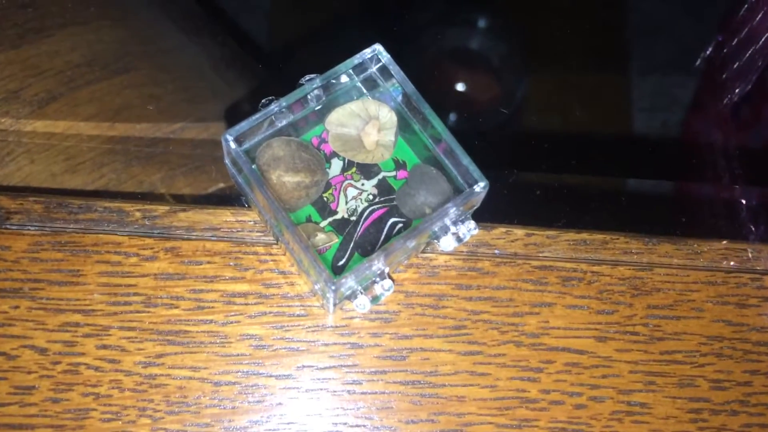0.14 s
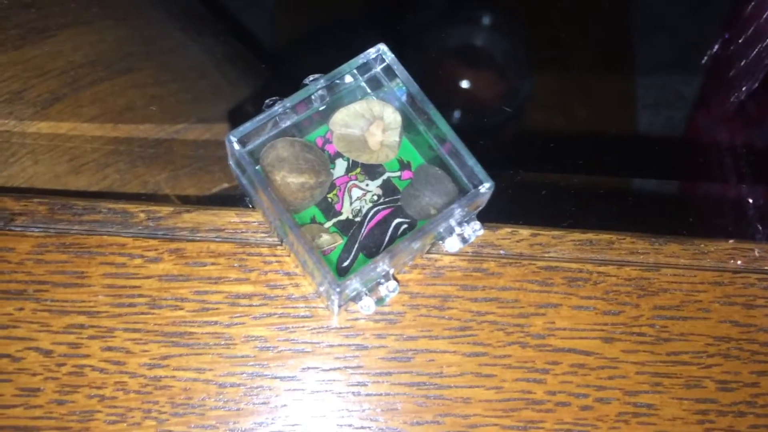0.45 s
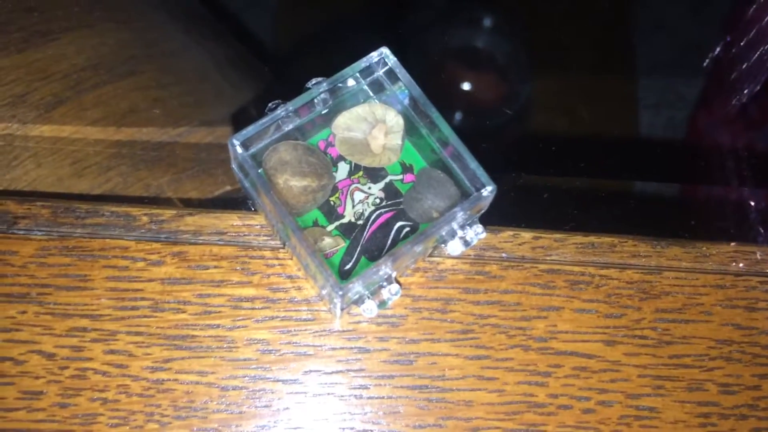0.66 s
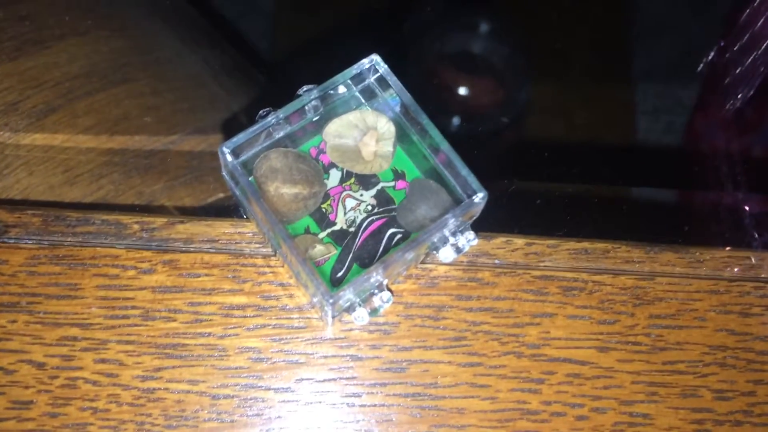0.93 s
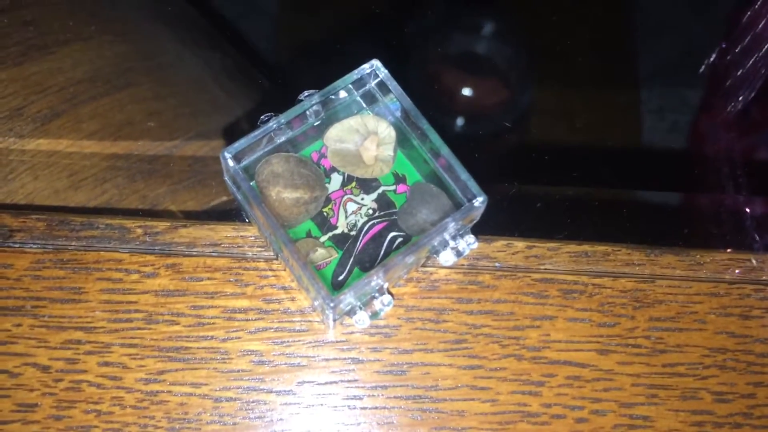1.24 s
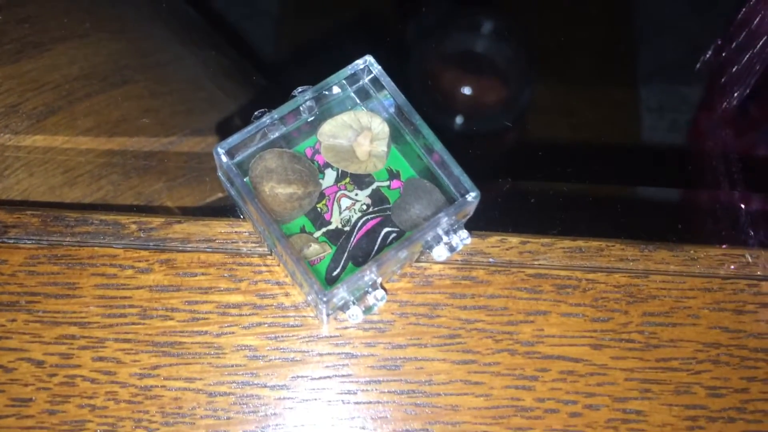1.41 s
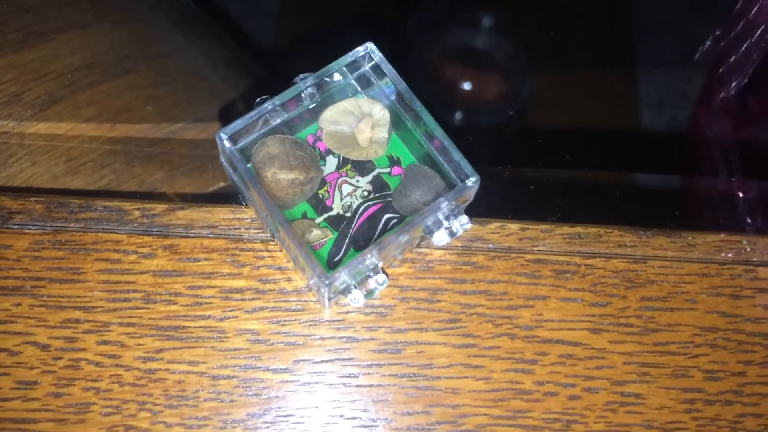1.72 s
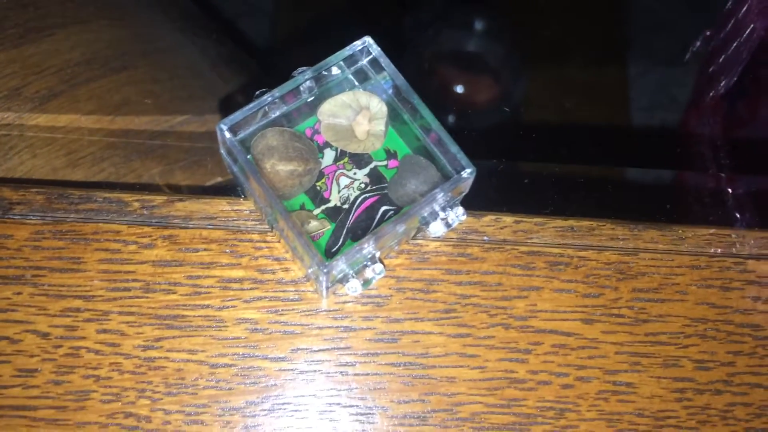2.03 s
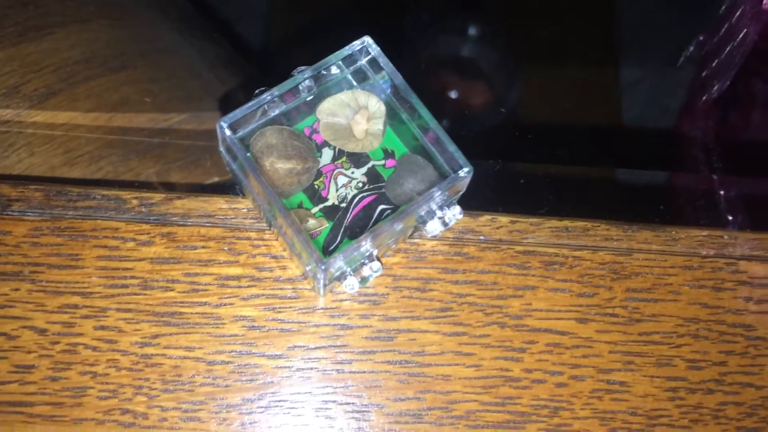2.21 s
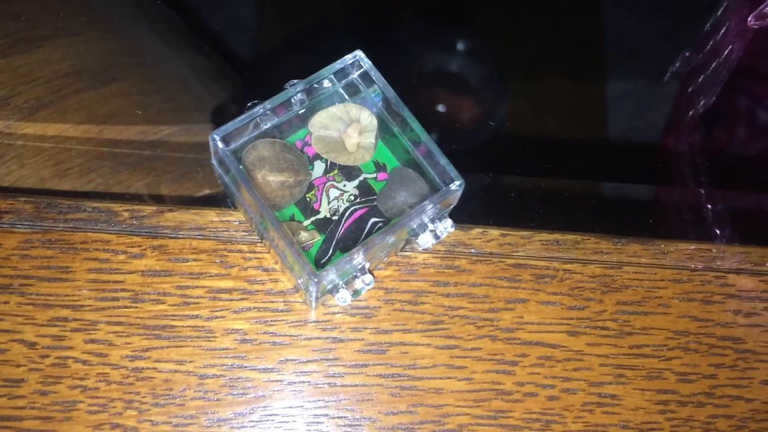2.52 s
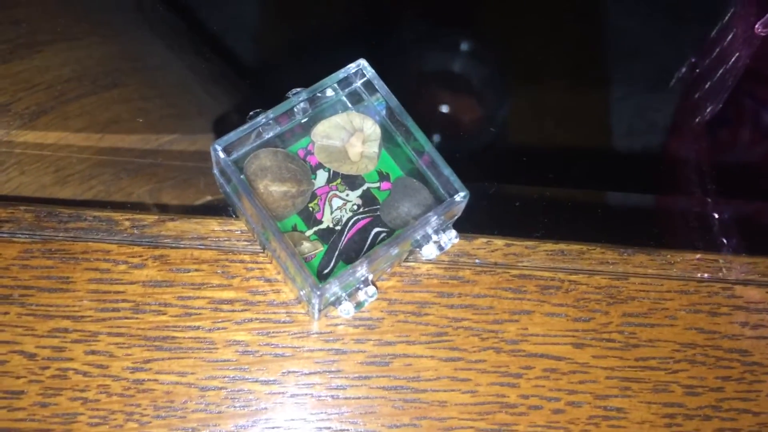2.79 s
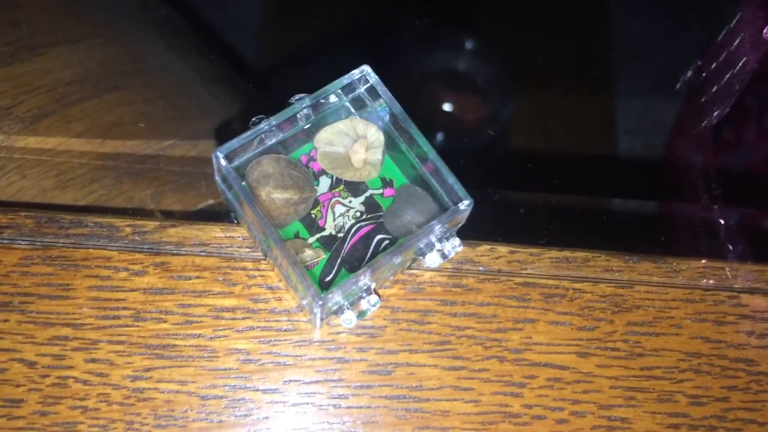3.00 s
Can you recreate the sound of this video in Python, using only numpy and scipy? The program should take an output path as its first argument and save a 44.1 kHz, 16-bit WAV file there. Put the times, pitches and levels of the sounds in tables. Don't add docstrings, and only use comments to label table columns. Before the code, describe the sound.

Three brief clattering clicks of small beans against thin plastic, over faint refrigerator hum

```python
import sys
import numpy as np
from scipy import signal
from scipy.fft import rfft, irfft
from scipy.io import wavfile
from scipy.ndimage import uniform_filter1d, map_coordinates

SR = 44100
rng = np.random.default_rng(int(sys.argv[2]) if len(sys.argv) > 2 else 0)


def gain_from_decibels(decibels):
    exponent = np.asarray(decibels, float) / 20
    return 10 ** exponent


def generate_wav(signal):
    frames = np.transpose(np.atleast_2d(signal))
    scaled = np.clip(frames, -1, 1) * 32767
    pcm = np.round(scaled).astype(np.int16)
    wavfile.write(sys.argv[1], SR, pcm)


N = 138915

# f/Hz, density/dB per Hz
AIR_SPECTRUM = [(18, -31), (30, -17.5), (59, -5), (181, -7), (221, -4.5), (392, -13), (551, -10),
                (1810, -19.5), (2200, -25), (2860, -54), (4840, -120)]
# f/Hz, width/Hz, lift/dB
FAN_DUCT = [(268, 58, 3), (530, 100, 2.5), (953, 33, 6.5), (1600, 54, 1.5), (1810, 20, 5.5)]
# f/Hz, density/dB per Hz
HISS_SPECTRUM = [(1290, -34), (2200, -8.5), (2460, -0.5), (2710, 3), (3040, -2), (5000, -4.5), (15000, -15)]
# f/Hz, level/dB rms, unsteadiness/dB
HUM_TONES = [(58.4, -63.5, 1.5), (74, -71.5, 4.5), (108.4, -69, 5), (147.6, -64.5, 2), (216.4, -60, 1),
             (243.5, -68.5, 1), (262.6, -71.5, 4), (318.6, -71, 4.5), (361, -74.5, 4.5), (430.6, -72.5, 4),
             (482.3, -69, 0.5), (548.3, -68, 4)]
# multiple of the shaft speed, level/dB rms
WHINE_TONES = [(13, -73), (14, -71), (15, -70), (16, -74), (17, -75), (19, -71), (20, -74), (30, -79),
               (31, -81)]
# f/Hz, t60/s
ROOM_DECAY = [(2000, 0.12), (5000, 0.11), (14000, 0.054)]
# f/Hz, level/dB
MICROPHONE_TOP = [(14600, 0), (15300, -20), (16200, -45)]
MODE_HZ = [2380, 4380, 4535, 4935, 5500, 6135, 6907, 7470, 7710, 9700, 10640, 11400, 12070, 13970]
MODE_T60_S = [.013, .055, .042, .022, .007, .05, .048, .032, .035, .016, .025, .008, .02, .016]
# level struck on the wall/dB, level struck on the floor/dB
MODE_DB = [(-15, -1.5), (-7.5, -0.5), (-5, -10.5), (-6.5, -8), (-7, -14), (-22, -18), (-19, -15),
           (-28, -2.5), (-8.5, -10.5), (-6, -10), (-21, -34), (-9.5, -8), (-19, -13.5), (-27, -16)]
# f/Hz, level/dB
WALL_CLICK = [(1000, -26), (3900, -13.5), (4600, 1), (6200, -2.5), (7700, -6), (10000, -6), (11900, -3.5),
              (13000, -20)]
# f/Hz, level/dB
FLOOR_CLICK = [(1500, -47), (2500, 12), (3500, -4.5), (4600, -5.5), (7800, 5), (11800, -11.5), (12700, -17),
               (13800, -9.5)]
# t/s, peak level/dB, ring level/dB, brightness/dB per octave
WALL_KNOCKS = [(.8735, -46, 2, -7), (.8802, -23.5, 0, -19), (.8827, -15.5, -3, 0.5), (1.8693, -48, -10, -8),
               (1.8761, -19.5, -1.5, -3.5), (1.8838, -21.5, -14, -7), (1.8955, -57, -9, -13),
               (2.9422, -53, 0, -10), (2.9527, -24, -2, 1), (2.9533, -17.5, 0.5, -1),
               (2.9630, -29, -1, -10)]
# t/s, peak level/dB, ring level/dB, brightness/dB per octave
FLOOR_LANDINGS = [
    (.8712, -38, 4, -7),
    (.9105, -17.5, -0.5, 3.5),
    (1.8738, -33, 1, -18),
    (1.9006, -21, 0.5, 2.5),
    (1.9040, -30, -4, -6),
    (2.9445, -58, 11, 2),
    (2.9738, -55, 9, 0),
    (2.9757, -41, 4, 11),
    (2.9769, -18, -1.5, 4.5),
]

AIR_DB, HISS_DB, ROOM_DB = -55, -71, -16
SHAFT_HZ = 59.38
RING_DB, SCATTER_DB, ATTACK_S = -10.5, 1.2, 0.0003
BOUNCE_S, BOUNCE_DB = 0.000177, 2.5
PIVOT_HZ = 4970


def unit(x):
    return x / np.sqrt(np.mean(x ** 2) + 1e-20)


def along(points, hz):
    f, value = np.transpose(points)
    return np.interp(np.log(hz + 1), np.log(f + 1), value)


def wobble(rate):
    knots = rng.standard_normal(int(N * rate / SR) + 4)
    return map_coordinates(knots, [np.arange(N) * rate / SR])


def noise(spectrum, patchy_db, humps=()):
    z = signal.stft(rng.standard_normal(N + SR), nperseg=512)[2]
    patches = uniform_filter1d(rng.standard_normal(z.shape), size=4, axis=0)
    patches = uniform_filter1d(patches, size=14, axis=1)
    x = signal.istft(z * gain_from_decibels(patchy_db * unit(patches)), nperseg=512)[1]
    f = np.fft.rfftfreq(len(x), 1 / SR)
    db = along(spectrum, f)
    for hz, width_hz, lift_db in humps:
        db = db + lift_db * np.exp(-((f - hz) / width_hz) ** 2)
    return unit(irfft(rfft(x) * gain_from_decibels(db), len(x))[:N])


def microphone_hiss():
    return gain_from_decibels(HISS_DB) * noise(HISS_SPECTRUM, patchy_db=1.5)


def room_air():
    swell = gain_from_decibels(AIR_DB + 0.17 * wobble(3.47))
    return swell * noise(AIR_SPECTRUM, patchy_db=1.56, humps=FAN_DUCT)


def refrigerator():
    t = np.arange(N) / SR
    tones = np.zeros(N)
    for hz, db, sway_db in HUM_TONES:
        level = gain_from_decibels(db + sway_db * wobble(7.074))
        phase = 0.38 * sway_db * wobble(7) + 7 * rng.random()
        tones += level * np.sin(2 * np.pi * hz * t + phase)
    for multiple, db in WHINE_TONES:
        level = gain_from_decibels(db + 2.27 * wobble(3.15))
        tones += level * np.sin(2 * np.pi * (multiple * SHAFT_HZ * t + rng.random()))
    return np.sqrt(2) * tones


def room(x):
    hz, t, z = signal.stft(rng.standard_normal(SR // 8), SR, nperseg=128)
    decay = gain_from_decibels(-60 * t / along(ROOM_DECAY, hz)[:, None])
    tail = signal.istft(z * decay, SR, nperseg=128)[1]
    return gain_from_decibels(ROOM_DB) * signal.fftconvolve(x, tail / np.linalg.norm(tail))[:len(x)]


def brightness(tilt_db, hz):
    return tilt_db * np.log2(np.maximum(hz, PIVOT_HZ) / PIVOT_HZ)


def click(colour, tilt_db, size):
    f = np.fft.rfftfreq(size, 1 / SR)
    db = along(colour, f) + along(MICROPHONE_TOP, f) + brightness(tilt_db, f)
    cepstrum = irfft(np.log(gain_from_decibels(db)), size)
    fold = np.r_[1, np.full(size // 2 - 1, 2), 1, np.zeros(size // 2 - 1)]
    direct = np.exp(rfft(cepstrum * fold))
    reflection = gain_from_decibels(BOUNCE_DB) * np.exp(-2j * np.pi * f * BOUNCE_S)
    pulse = irfft(direct * (1 + reflection), size)
    return pulse / abs(pulse).max()


def box_ring(mode_db, ring_db, tilt_db, t):
    hz, t60 = np.c_[MODE_HZ], np.c_[MODE_T60_S]
    sign = (-1) ** np.c_[:len(hz)]
    level = np.c_[mode_db] + RING_DB + ring_db + brightness(tilt_db, hz)
    level = level + SCATTER_DB * rng.standard_normal(hz.shape)
    modes = sign * gain_from_decibels(level - 60 * t / t60) * np.sin(2 * np.pi * hz * t)
    return modes.sum(axis=0) * (1 - np.exp(-(t / ATTACK_S) ** 2))


def bean_contacts(contacts, mode_db, colour):
    out, t = np.zeros(N + SR), np.arange(8192) / SR
    for s, peak_db, ring_db, tilt_db in contacts:
        ring = box_ring(mode_db, ring_db, tilt_db, t)
        snap = click(colour, tilt_db, size=len(t))
        out[round(s * SR):][:len(t)] += gain_from_decibels(peak_db) * (ring + snap + room(snap))
    return out[:N]


def scene():
    wall_db, floor_db = np.transpose(MODE_DB)
    background = microphone_hiss() + room_air() + refrigerator()
    knocks = bean_contacts(WALL_KNOCKS, wall_db, WALL_CLICK)
    landings = bean_contacts(FLOOR_LANDINGS, floor_db, FLOOR_CLICK)
    return (background + knocks + landings)[None]


def roll_off(x):
    return signal.sosfilt(signal.butter(12, 15200, fs=SR, output="sos"), x)


def record(dry):
    return roll_off(dry)


dry = scene()
out = record(dry)
generate_wav(out)
```